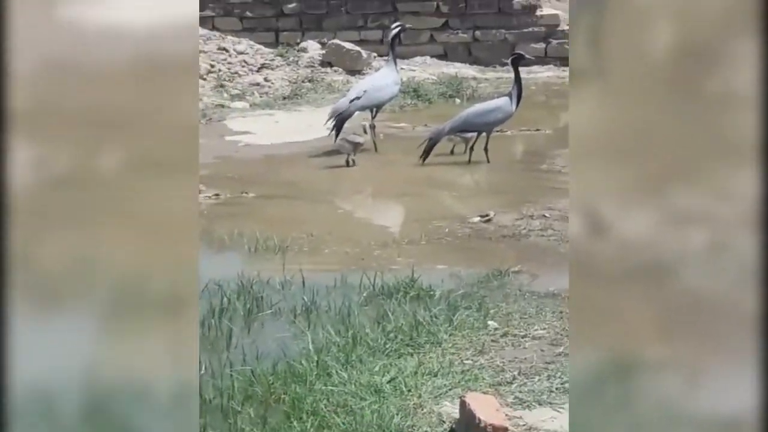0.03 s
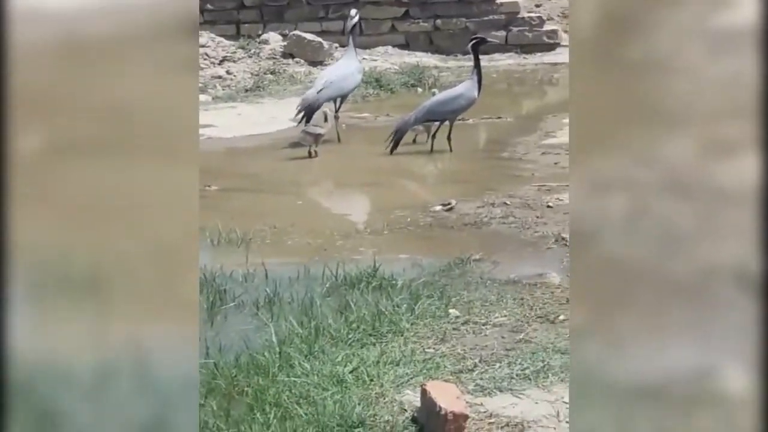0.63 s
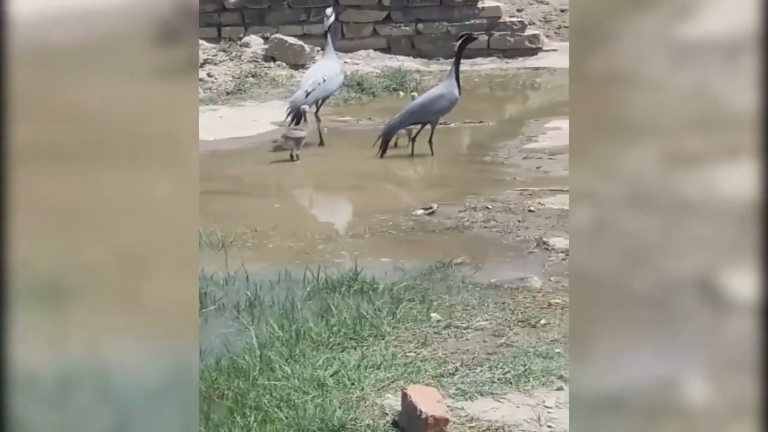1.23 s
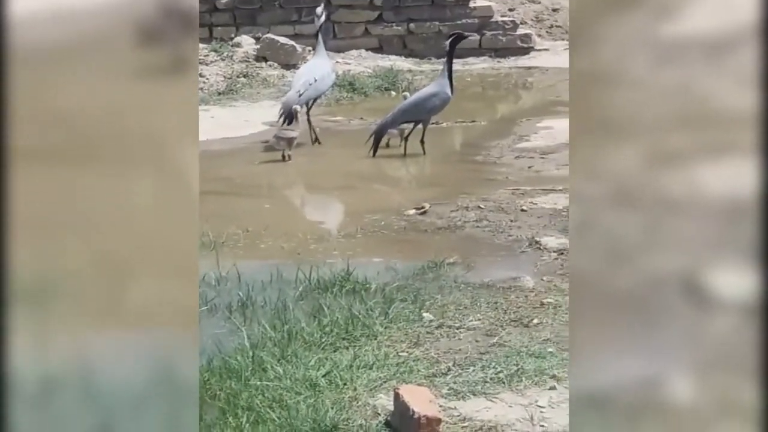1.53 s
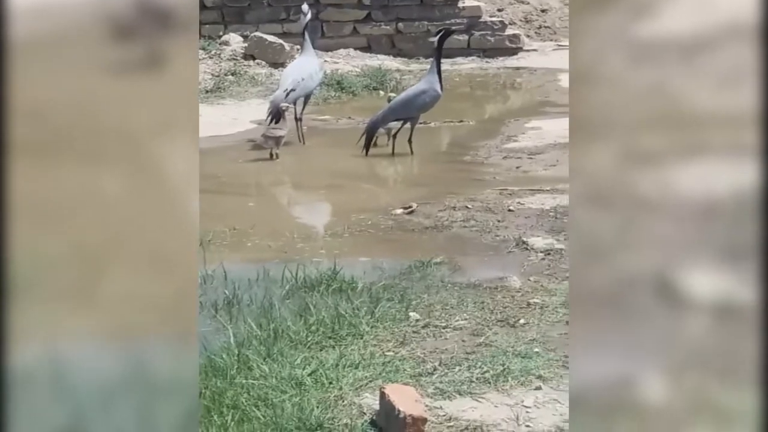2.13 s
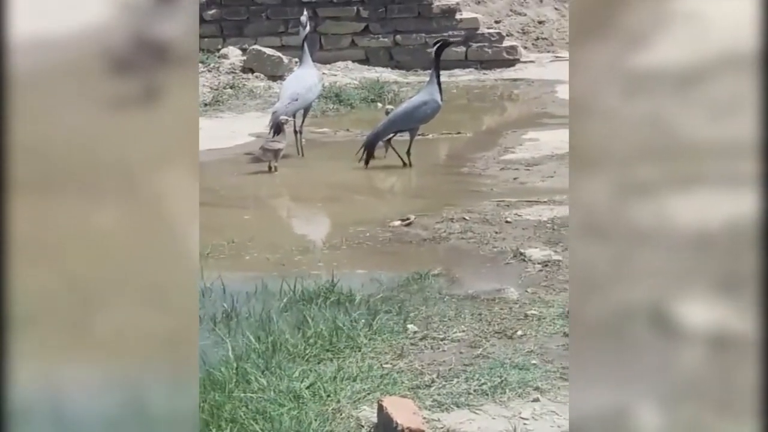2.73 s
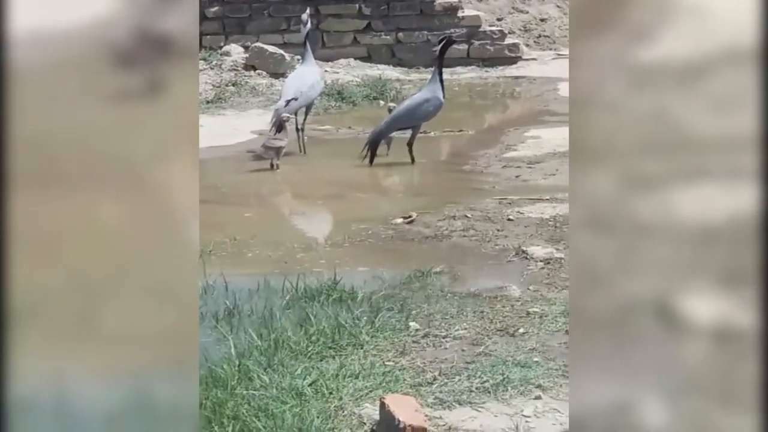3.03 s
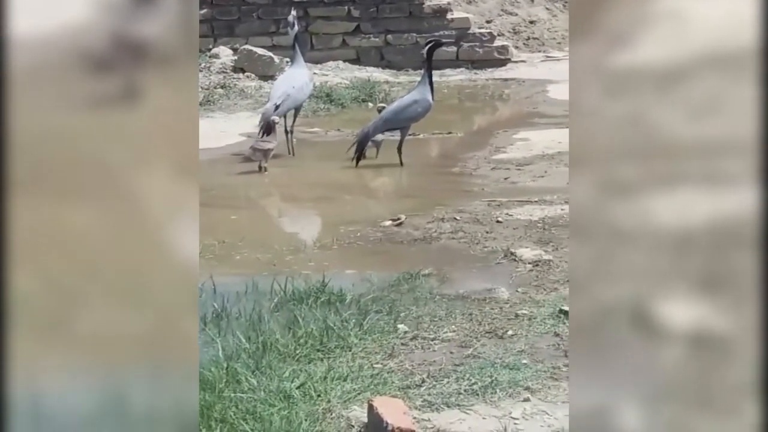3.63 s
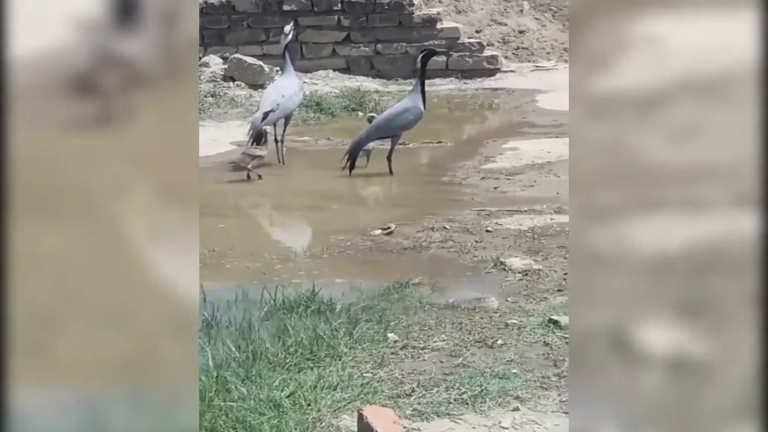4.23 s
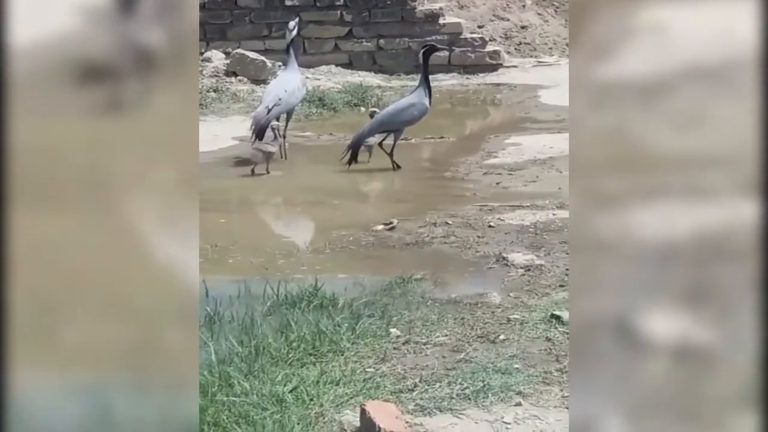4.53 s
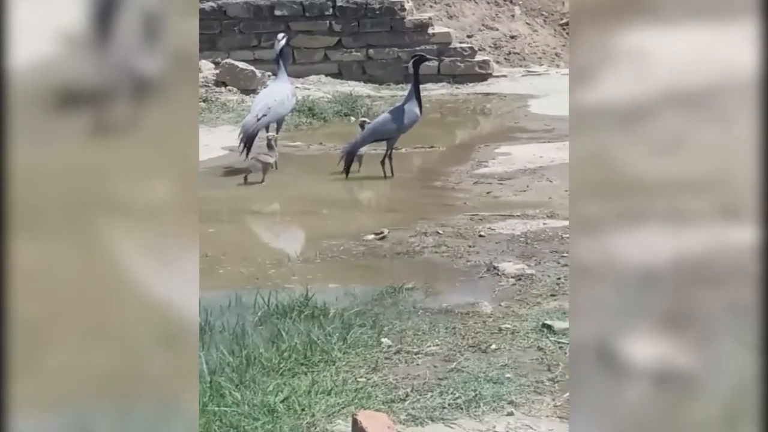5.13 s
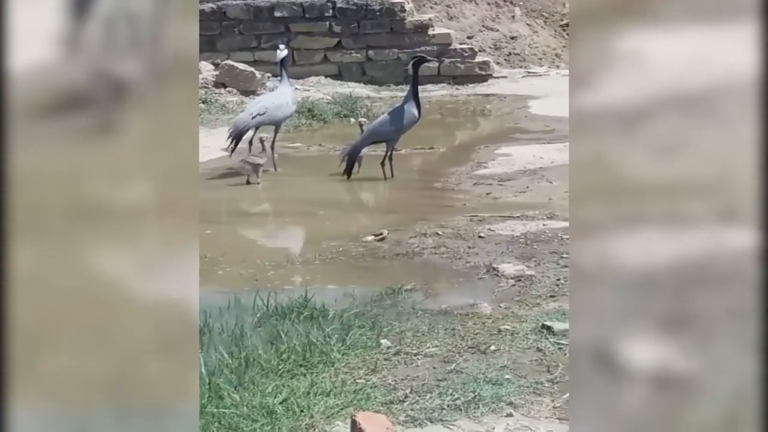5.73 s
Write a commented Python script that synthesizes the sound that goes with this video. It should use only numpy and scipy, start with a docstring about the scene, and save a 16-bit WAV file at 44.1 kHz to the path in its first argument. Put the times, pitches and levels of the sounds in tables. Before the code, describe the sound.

After a thump of wind, faint far twitters and two quiet purrs, a pair of cranes starts a quick duet. Each call is a brief rattle of rasping hoots, the higher bird clearer, the lower one hoarser and growing louder. The open yard adds a light echo, while uneven gusts rumble right on the microphone. Near the end the cranes fall silent, and only wind and tiny distant bird chirps remain.

```python
"""Two cranes in a muddy pool, heard with the echo of the bank and a stone wall. A gust thumps the
microphone, small birds twitter far off, and two soft purrs come through a closed bill. From 1.2 s a
higher and a lower crane take turns, each call a rattle of rasping hoots from the syrinx, about 30 a
second, over a low hum of the long neck. Wind buffets the microphone more often as the duet goes on.
The calls end near 4.8 s, leaving the wind and a few more distant chirps."""
import sys
import numpy as np
from scipy import signal
from scipy.fft import rfft, irfft
from scipy.io import wavfile
from scipy.ndimage import uniform_filter1d, minimum_filter1d

SR = 44100
rng = np.random.default_rng(int(sys.argv[2]) if len(sys.argv) > 2 else 0)


def dump(signal):
    """Clip the signal to [-1, 1] and save it as 16-bit WAV at the path in sys.argv[1]."""
    limited = np.clip(np.atleast_2d(signal).T, -1, 1)
    pcm = np.round(limited * 32767).astype(np.int16)
    wavfile.write(sys.argv[1], SR, pcm)


N = 264600
TIME = np.arange(N) / SR

# Calls of the higher crane; first and last gap are multiples of the middle gap, all levels relative:
# start t/s, end t/s, hoots, first gap, last gap, first f/Hz, top f/Hz, last f/Hz,
# tone level/dB, rasp level/dB
HIGH_CRANE_CALLS = [(1.2161, 1.5956, 12, 0.99, 1.33, 1205, 1368, 1233, -9.5, -33),
                    (2.0235, 2.2751, 10, .98, 0.75, 1234, 1459, 1168, -7.8, -29.5),
                    (2.6996, 2.95, 10, 0.98, 0.79, 1215, 1467, 1287, -7.5, -29.5),
                    (3.2612, 3.459, 8, .87, 0.76, 1207, 1470, 1323, -8.5, -27.5),
                    (4.1962, 4.4568, 10, 1.023, 1.143, 1372, 1451, 1102, -7, -26.5)]
# Its throat and bill resonances: f/Hz, width/Hz, level/dB
HIGH_THROAT_MODES = [(2020, 270, -7), (2687, 1240, -5.5), (3610, 150, -9.5), (4080, 210, -6.5),
                     (4545, 334, -1), (5713, 310, -13), (6186, 560, -5), (6970, 136, -12), (8840, 89, -9.5),
                     (10560, 200, -29.5), (12450, 1900, -23), (13500, 3000, -23.5)]
HIGH_SLACK_LOSS_DB = (2.5, 6.5)  # tone, rasp


def high_crane():
    """The higher bird in the pool: a clear hoot whose rasp dies quickly."""
    return syrinx(hoots_of(HIGH_CRANE_CALLS, HIGH_SLACK_LOSS_DB), HIGH_THROAT_MODES,
                  throb_s=.0069, strain_hz=1272.6, sag=.36, jitter=.014, rough=.3, overtone_slope_db=4.5,
                  tone_db=-1, octave_db=-21.5, rasp_db=6, rasp_fade_db=-15,
                  bright_hz=14300, pipe_hz=[1030, 1680])


# Calls and throat resonances of the lower crane: columns as for the higher one
LOW_CRANE_CALLS = [(1.7835, 2.009, 6, 0.96, 1.02, 1118, 1117, 1140, -26, -39.5),
                   (2.4868, 2.678, 6, 0.85, 0.92, 1011, 1107, 1085, -17.5, -34),
                   (2.9814, 3.203, 8, 1.07, .52, 1112, 1175, 928, -10.5, -29),
                   (3.4872, 3.713, 9, 1.09, 1.02, 1202, 1187, 913, -8, -27),
                   (3.9552, 4.1874, 9, 1.2, 1.05, 1080, 1185, 1096, -8, -29.5),
                   (4.5463, 4.82, 10, 1.26, 1.125, 1085, 1198, 943, -8.5, -30.5)]
LOW_THROAT_MODES = [(1958, 237, 2), (2516, 620, -0.5), (2728, 160, 1), (3710, 220, -11), (4196, 715, -2.5),
                    (4750, 360, -12.5), (5960, 300, -10), (7020, 500, -45), (9100, 130, -17),
                    (10000, 930, -21.5), (12500, 1260, -23.5)]
LOW_SLACK_LOSS_DB = (15, 5)  # tone, rasp


def low_crane():
    """The lower bird answers hoarsely, with more turbulence in its rasp."""
    return syrinx(hoots_of(LOW_CRANE_CALLS, LOW_SLACK_LOSS_DB), LOW_THROAT_MODES,
                  throb_s=.00712, strain_hz=1220, sag=.14, jitter=.022, rough=.5, overtone_slope_db=8,
                  tone_db=0, octave_db=-15, rasp_db=3.5, rasp_fade_db=-4,
                  bright_hz=11540, pipe_hz=[900, 1600])


def hoots_of(calls, loss_db, crest=.38, slack_hz=190, spread_hz=12.2, spread_db=1.26):
    """Hoots as (t/s, tone level/dB, f/Hz, rasp level/dB): the pace bends, the pitch arches."""
    rows = []
    for start, end, count, first_gap, last_gap, first_hz, top_hz, last_hz, tone_db, rasp_db in calls:
        pace = np.polyfit([0, .5, 1], [first_gap, 1, last_gap], 2)
        gaps = np.polyval(pace, np.linspace(0, 1, count - 1))
        onsets = start + (end - start) * np.cumsum([0, *gaps]) / gaps.sum()
        along = np.linspace(0, 1, count)
        rising = np.maximum(1 - along / crest, 0) ** 3.5
        falling = np.maximum((along - crest) / (1 - crest), 0) ** 2.223
        drop_hz = (top_hz - first_hz) * rising + (top_hz - last_hz) * falling
        slack = np.maximum(drop_hz / slack_hz, 0) ** 1.25  # hoots below the top pitch are softer
        off_hz, off_db = (rng.standard_normal((count, 2)) * [spread_hz, spread_db]).T
        rows += zip(onsets, tone_db - loss_db[0] * slack,
                    top_hz - drop_hz + off_hz, rasp_db - loss_db[1] * slack + off_db)
    return rows


def syrinx(hoots, throat, throb_s, strain_hz, sag, jitter, rough, overtone_slope_db,
           tone_db, octave_db, rasp_db, rasp_fade_db, bright_hz, pipe_hz):
    """The syrinx opens for about 20 ms per hoot: a nearly pure tone with a rasp riding on it."""
    tone, octave, rasp = np.zeros((3, N))
    wander, hiss = drift(350), rng.standard_normal(N)
    orders = np.arange(2, 11)[:, None]
    weights = from_db(overtone_slope_db * np.log2(orders))
    for (onset, peak_db, pitch, harsh_db), chance in zip(hoots, rng.uniform(-1, 1, len(hoots))):
        strain = np.clip((pitch - strain_hz) / 130, 0, 1)
        period = throb_s * (1 + .08 * chance)
        length = period * (3 - .25 * strain)
        t = np.arange(int(length * SR)) / SR
        at = int((onset - .001098 * (1 - strain)) * SR) + np.arange(len(t))
        swell = throbs(t, strain, period)
        gate = swell * np.clip(np.minimum(t, length - t) / .0015, 0, 1)
        # the pitch arches and sags as the pressure runs out; it slips where the tone is weak
        arch = 1.01 - sag * (t / length - .3) ** 2
        slip = jitter * wander[at] * (1 + 3 * (1 - swell) ** 2)
        phase = 2 * np.pi * np.cumsum(pitch * (arch + slip)) / SR
        tone[at] += from_db(peak_db) * gate * np.sin(phase)
        octave[at] += from_db(peak_db) * gate ** 2 * np.sin(2 * phase)
        # the membranes slap shut once a cycle: overtones and a puff of turbulence
        buzz = (weights * np.cos(orders * phase)).sum(0) / np.sqrt((weights ** 2).sum() / 2)
        slap = np.sqrt(1 - rough) * buzz + np.sqrt(rough) * hiss[at] * (1 + np.cos(phase))
        # a louder hoot is brighter, and hardest at its start
        slap = cut(slap, bright_hz * 2 ** ((peak_db - .5) / 10), "low", order=1)
        rasp[at] += from_db(harsh_db + rasp_fade_db * t / length) * gate ** .49 * slap
    voice = from_db(tone_db) * cut(tone, pipe_hz, "band")  # the windpipe passes a band round the tone
    return voice + from_db(octave_db) * octave + from_db(rasp_db) * resonate(rasp, throat)


def throbs(t, strain, period_s):
    """A slack hoot throbs twice and then once faintly; a strained one is held almost level."""
    depth = .95 - .67 * strain
    swell = 1 - depth + depth * np.abs(np.sin(np.pi * t / period_s)) ** 1.2
    fade_db = np.interp(t / period_s, [.5, 1.5, 2.5, 3], [0, -1.5, -12, -18])
    return swell * from_db((1 - strain ** 3) * fade_db)


# Purrs before the duet: start t/s, pulses, gap/s, first level/dB, last level/dB
OPENING_PURRS = [(0.19, 7, .0493, -45.5, -44), (.905, 7, .0475, -45, -26)]


def purr_pulses():
    """Evenly paced pulses as (t/s, level/dB), growing through each purr."""
    return [(start + gap * k, db) for start, count, gap, first_db, last_db in OPENING_PURRS
            for k, db in enumerate(np.linspace(first_db, last_db, count))]


# Resonances of the closed bill: f/Hz, width/Hz, level/dB
BILL_MODES = [(723, 150, 2), (793, 72, 7), (1020, 130, 5.5), (1520, 170, -4), (2750, 270, -13),
              (3380, 240, -17)]


def purr(gain_db, decay_s):
    """Soft, quickly dying puffs of noise, muffled by the closed bill."""
    kicks = np.zeros(N)
    for onset, db in purr_pulses():
        kicks[int(onset * SR)] = from_db(db)
    puffs = die_away(kicks, decay_s) * rng.standard_normal(N)
    return from_db(gain_db) * cut(resonate(puffs, BILL_MODES), 3940, "low", order=8)


# Hums with the purrs and the lower calls: start t/s, end t/s, end level/dB
NECK_HUMS = [(0.18, .48, -47), (.98, 1.5, -39), (1.752, 2.23, -38), (2.466, 2.77, -37), (2.96, 3.22, -38.5),
             (3.46, 3.71, -42.5), (3.956, 4.28, -39.5), (4.528, 4.84, -39.5)]


def neck_hum(gain_db, pitch_hz, waver, throb_s, build_db=7.5, attack_s=.03, release_s=.036):
    """The long neck hums, swelling after every pulse, building through a call and then dying away."""
    pulses = purr_pulses() + hoots_of(HIGH_CRANE_CALLS, HIGH_SLACK_LOSS_DB)
    pulses += hoots_of(LOW_CRANE_CALLS, LOW_SLACK_LOSS_DB)
    kicks = np.zeros(N)
    kicks[[int(row[0] * SR) for row in pulses]] = 1
    swell = rms_one(cut(die_away(kicks, throb_s), 125, "low"))
    level = 0
    for start, end, db in NECK_HUMS:
        gate = np.clip((TIME - start) / attack_s, 0, 1) * np.exp(-np.maximum(TIME - end, 0) / release_s)
        level += gate * from_db(gain_db + np.interp(TIME, [start, end], [db - build_db, db]))
    hz = pitch_hz * (1 + waver * drift(139.6))
    return level * swell * np.sin(2 * np.pi * np.cumsum(hz) / SR)


# Reflections from the nearby bank and wall: delay t/s, level/dB
NEAR_ECHOES = [(.0085, -13.5), (0.0116, -26.5), (0.02, -27)]
# Ring of the yard round the pool: f/Hz, t60/s, level/dB
YARD_RING = [(489, 0.23, -2), (780, 0.36, -11), (1260, 0.78, -16.5), (2410, 0.53, -10.5), (5100, 1, -17),
             (9050, 0.418, -10.5), (15000, 0.27, -2.5)]


def yard(x, dull_hz, onset_s, scatter_db, scatter_s):
    """The direct sound reaches the microphone, then hard echoes, scatter from rough stones and a tail."""
    dull = cut(x, dull_hz, "low", order=1)
    early = sum(from_db(db) * np.interp(TIME - delay, TIME, dull, left=0) for delay, db in NEAR_ECHOES)
    t = TIME[:SR]
    scatter = np.exp(-t / scatter_s) * (t > NEAR_ECHOES[0][0])
    scatter *= from_db(scatter_db) / np.linalg.norm(scatter)
    edges_hz = np.geomspace(400, 16000, 12)
    response = 0
    for low, high in zip(edges_hz, edges_hz[1:]):
        centre = np.sqrt(low * high)
        tail = from_db(-60 * t / at_hz(YARD_RING, centre)) * (1 - np.exp(-t / onset_s))
        tail *= from_db(at_hz(YARD_RING, centre, column=2)) / np.linalg.norm(tail)
        response += (tail + scatter) * cut(rng.standard_normal(len(t)), [low, high], "band")
    return x + early + signal.fftconvolve(dull, response)[:N]


# Gusts right on the microphone: t/s, level/dB, width before narrowing/s
MIC_GUSTS = [(0.108, -10, 0.026), (1.377, -20.5, 0.019), (1.664, -19.5, 0.019), (2.134, -23.5, 0.052),
             (2.463, -21, 0.025), (2.64, -18, 0.022), (2.918, -23.5, 0.023), (3.325, -19.5, 0.093),
             (3.465, -14, 0.054), (3.516, -14, 0.022), (3.588, -18.5, 0.073), (3.836, -20, 0.042),
             (3.935, -20, 0.018), (3.977, -14.5, 0.021), (4.221, -15, 0.024), (4.357, -17, 0.024),
             (4.512, -21, 0.024), (4.802, -23.5, 0.041), (4.915, -17.5, 0.038), (5.191, -19, 0.018),
             (5.299, -16.5, 0.028), (5.499, -17, 0.059), (5.712, -17, 0.061)]
# Spectrum of their eddies: f/Hz, level/dB
EDDY_SPECTRUM = [(25, -34.5), (45, -17.5), (75, -2), (120, 3), (200, -3), (300, -11), (450, -21.5),
                 (700, -33.5), (1200, -56), (3000, -83)]


def wind_buffets(gain_db, narrowing, split_hz, hard_db, brightening):
    """Eddies hit the microphone port as short thumps; a harder one reaches higher."""
    power = sum(from_db(db) ** 2 / np.cosh(np.clip(narrowing * (TIME - peak_s) / width, -20, 20)) ** 2
                for peak_s, db, width in MIC_GUSTS)
    push = np.sqrt(power)
    eddies = noise(EDDY_SPECTRUM)
    eddies /= np.sqrt(np.abs(uniform_filter1d(eddies ** 2, int(.025 * SR))) + 1e-6)  # evened over 25 ms
    deep = cut(eddies, split_hz, "low", order=1)
    edge = (eddies - deep) * (push / from_db(hard_db)) ** brightening
    return from_db(gain_db) * push * (deep + edge)


# Breeze at the microphone between gusts: t/s, level/dB
BREEZE_STRENGTH = [(0.0, -38), (0.17, -53), (2.54, -40.5), (2.91, -45), (3.51, -36.5), (3.61, -43),
                   (3.78, -46.5), (4.13, -32.5), (4.56, -42), (5.16, -47), (5.31, -39.5), (6.0, -37.5)]
# Spectrum of its rumble: f/Hz, level/dB
BREEZE_SPECTRUM = [(25, -21.5), (45, -6.5), (70, 2.5), (110, 1), (200, -7), (300, -17), (500, -23.5),
                   (1000, -46), (3000, -61.5)]


def breeze(gain_db, lumpy_db):
    """Lighter wind keeps up a lumpy rumble on the microphone."""
    level_db = np.interp(TIME, *np.transpose(BREEZE_STRENGTH)) + gain_db + lumpy_db * drift(9.4)
    return from_db(level_db) * noise(BREEZE_SPECTRUM)


# Chirps far from the microphone: t/s, length/s, start f/Hz, end f/Hz, level/dB
FAR_CHIRPS = [(0.104, 0.041, 4330, 3900, -65), (0.26, .044, 3500, 4340, -62), (.3, 0.045, 3020, 3470, -61),
              (.35, .034, 4000, 3700, -62), (.641, .037, 3700, 4200, -62), (0.745, 0.059, 1735, 1740, -58),
              (5.116, .058, 4870, 4270, -58), (5.15, 0.05, 3700, 4300, -58.5),
              (5.26, 0.065, 3780, 4140, -58), (5.31, 0.058, 3500, 2930, -57),
              (5.828, 0.07, 4600, 3720, -64)]


def small_birds(gain_db, warble):
    """Distant birds twitter in thin, wavering glides."""
    out, wander = np.zeros(N), drift(120)
    for onset, length, start_hz, end_hz, db in FAR_CHIRPS:
        at = int(onset * SR) + np.arange(int(length * SR))
        hz = np.linspace(start_hz, end_hz, len(at)) * (1 + warble * wander[at])
        out[at] += from_db(db + gain_db) * np.hanning(len(at)) * np.sin(2 * np.pi * np.cumsum(hz) / SR)
    return out


# Spectrum of the air all round the pool: f/Hz, level/dB
AIR_SPECTRUM = [(530, -32.5), (900, 1), (1040, -5.5), (1340, -5), (2260, -9.5), (3080, -19), (3820, -18),
                (4740, -23.5), (5880, -25), (8930, -17), (10300, -24.5), (11600, -19), (15700, -19)]


def still_air(level_db):
    """A faint, steady hiss behind everything."""
    return from_db(level_db) * noise(AIR_SPECTRUM)


def from_db(db):
    """Decibels to gain."""
    return 10 ** (np.asarray(db) / 20)


def rms_one(x):
    """Scale to rms 1."""
    return x / np.sqrt(np.mean(x ** 2) + 1e-20)


def at_hz(points, hz, column=1):
    """Read one column of a table on a log-frequency axis."""
    table = np.array(points)
    return np.interp(np.log(np.maximum(hz, 1)), np.log(table[:, 0]), table[:, column])


def cut(x, hz, kind, order=2):
    """Butterworth filter."""
    return signal.sosfilt(signal.butter(order, np.minimum(hz, SR * .49), kind, fs=SR, output="sos"),
                          x + 1e-18)


def noise(spectrum):
    """Steady noise with a given spectrum, rms 1."""
    gains = from_db(at_hz(spectrum, np.arange(N // 2 + 1) * SR / N))
    return rms_one(irfft(rfft(rng.standard_normal(N)) * gains, N))


def drift(rate_hz):
    """Random wander up to a given rate, spread 1."""
    return rms_one(cut(rng.standard_normal(N), rate_hz, "low"))


def die_away(kicks, decay_s):
    """Give each kick an exponential decay."""
    return signal.lfilter([1], [1, -np.exp(-1 / (decay_s * SR))], kicks + 1e-18)


def resonate(x, modes):
    """Parallel resonances, each applied twice for dark valleys; white noise keeps its power."""
    out, power = 0, 0
    for hz, width, db in modes:
        r = np.exp(-np.pi * width * np.sqrt(2) / SR)
        section = [(1 - r * r) / 2, 0, -(1 - r * r) / 2, 1, -2 * r * np.cos(2 * np.pi * hz / SR), r * r]
        out += from_db(db) * signal.sosfilt([section, section], x + 1e-18)
        power += from_db(db) ** 2 * np.pi * width / SR / np.sqrt(2)
    return out / np.sqrt(power)


def scene():
    """Cranes and far birds echo in the yard; air and wind arrive dry at the one microphone."""
    purrs = purr(gain_db=-1.5, decay_s=.0055)
    hum = neck_hum(gain_db=.5, pitch_hz=786, waver=.0863, throb_s=.029)
    twitter = small_birds(gain_db=-4, warble=.04)
    voices = high_crane() + low_crane() + purrs + hum + twitter
    birds = yard(voices, dull_hz=9070, onset_s=.016, scatter_db=-18, scatter_s=.022)
    air = still_air(level_db=-61.5)
    thumps = wind_buffets(gain_db=-4.5, narrowing=2.9, split_hz=310, hard_db=-20.5, brightening=.88)
    rumble = breeze(gain_db=1.5, lumpy_db=6.5)
    return (birds + thumps + rumble + air)[None]


def record(dry):
    """The microphone sheds the deepest rumble, a quick limiter holds peaks, the top is cut steeply."""
    thinned = cut(dry, 42.3, "high", order=3)
    allowed = np.minimum(1, .5 / (np.abs(thinned) + 1e-9))
    gain = uniform_filter1d(minimum_filter1d(allowed, size=200), size=200)
    return signal.sosfilt(signal.ellip(10, .1, 90, 15500, fs=SR, output="sos"), gain * thinned)


dry = scene()
out = record(dry)
dump(out)
```